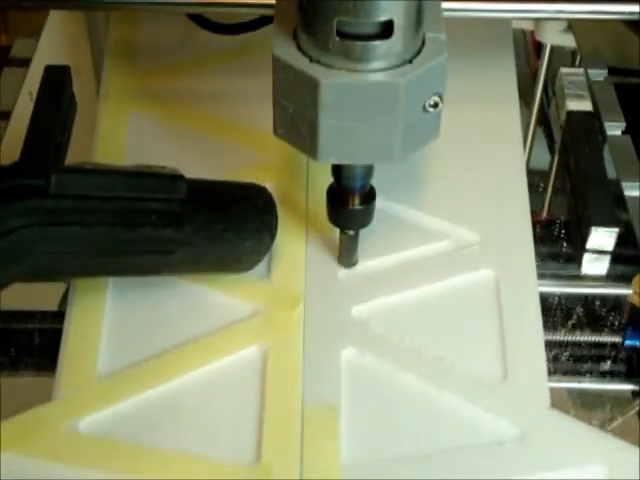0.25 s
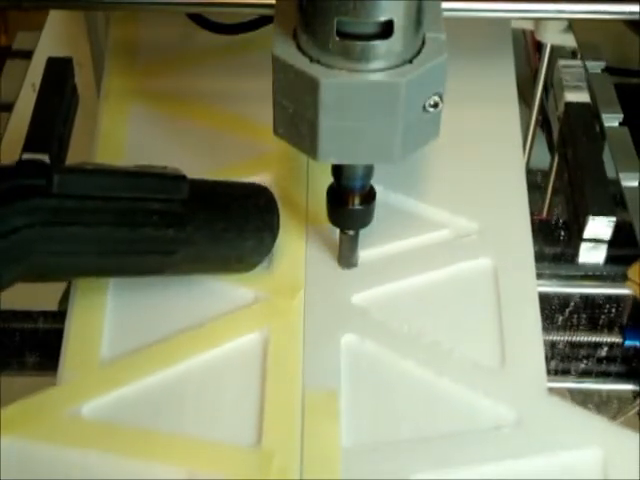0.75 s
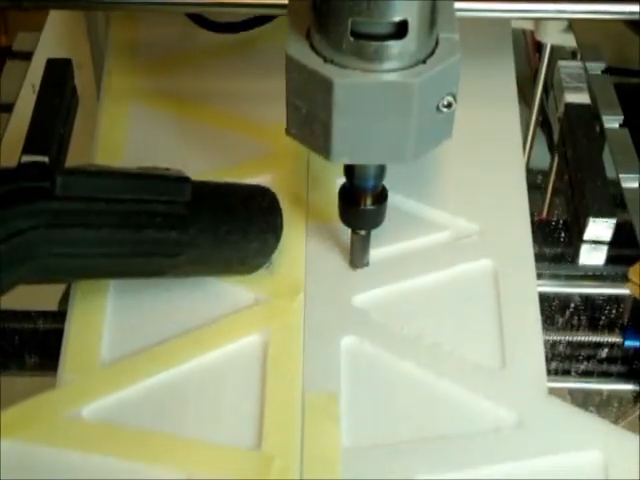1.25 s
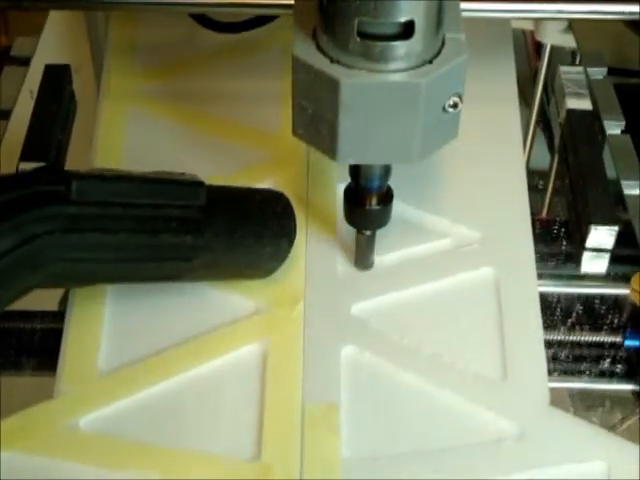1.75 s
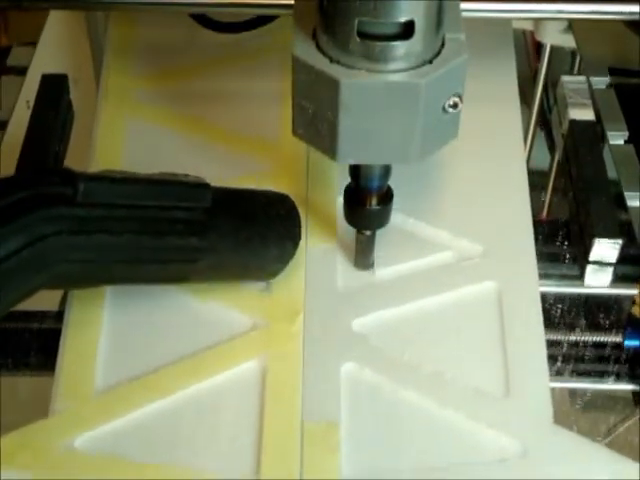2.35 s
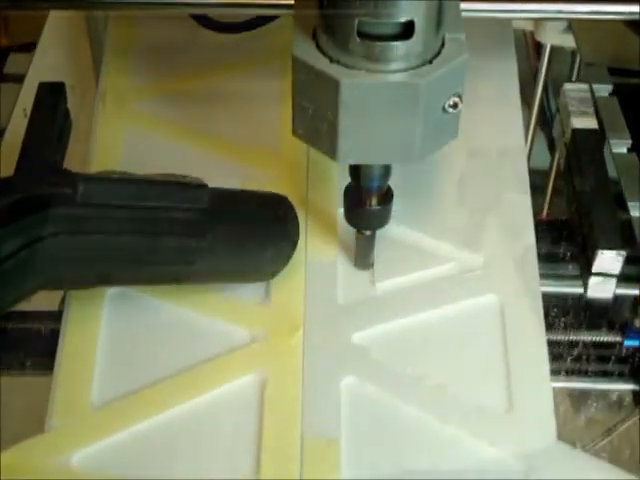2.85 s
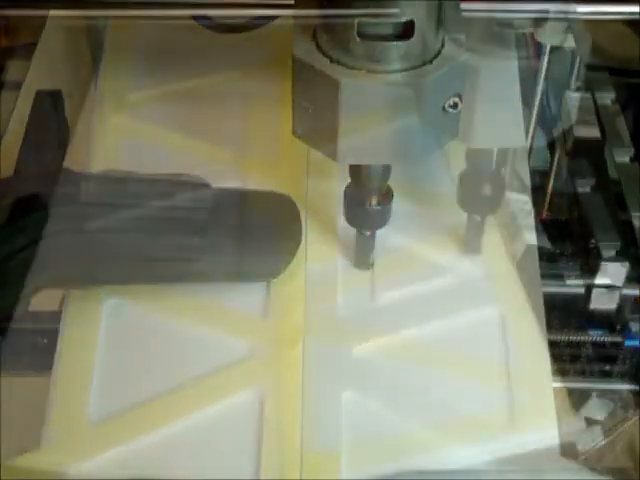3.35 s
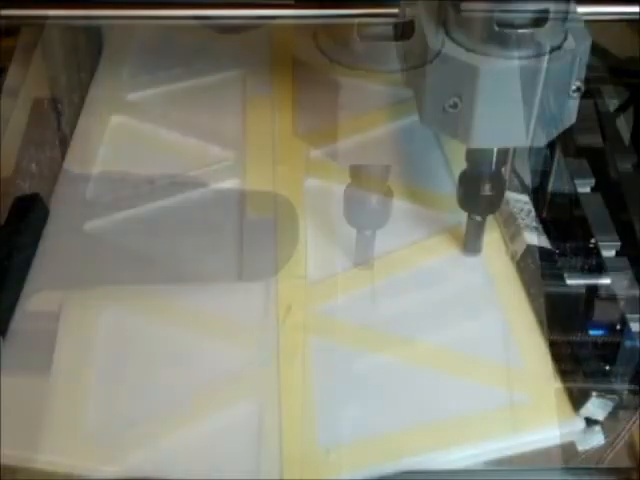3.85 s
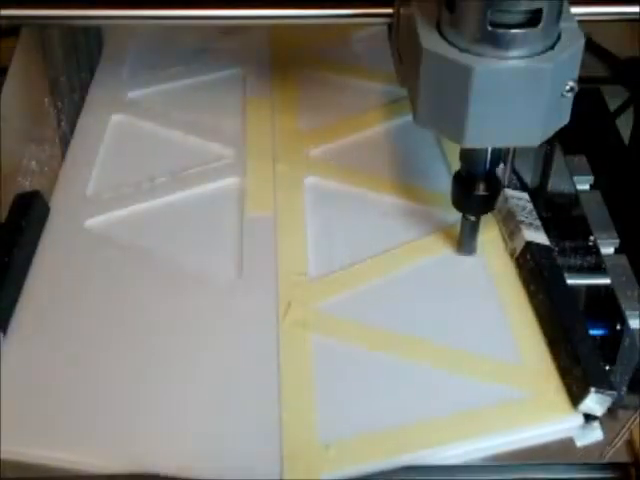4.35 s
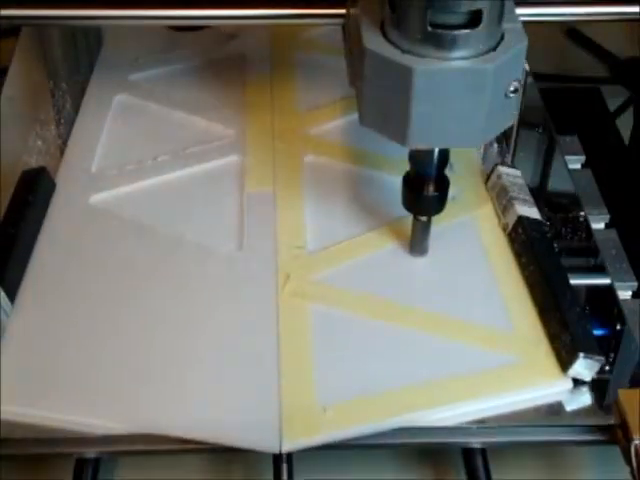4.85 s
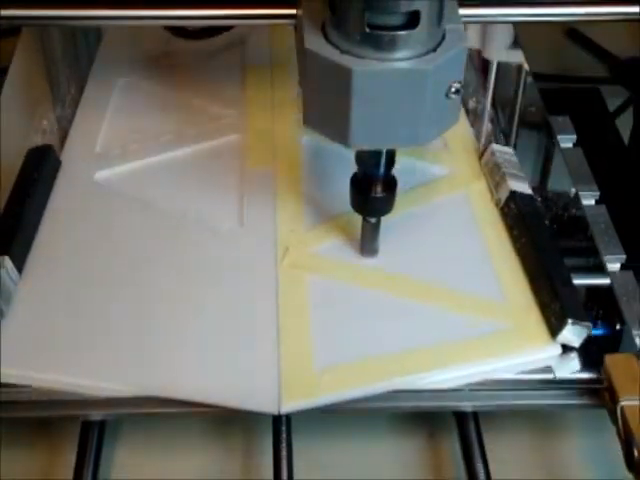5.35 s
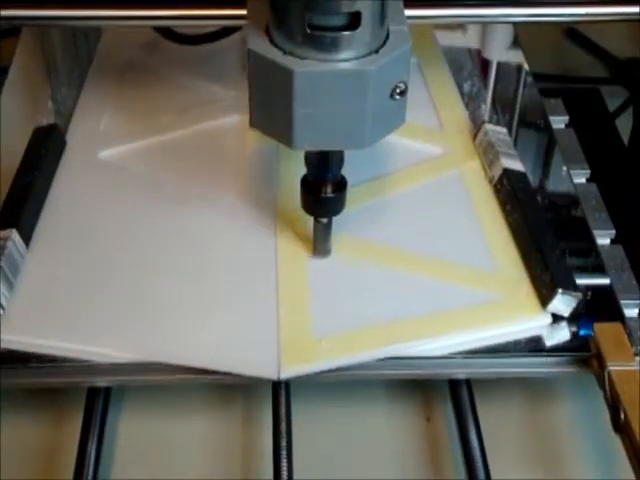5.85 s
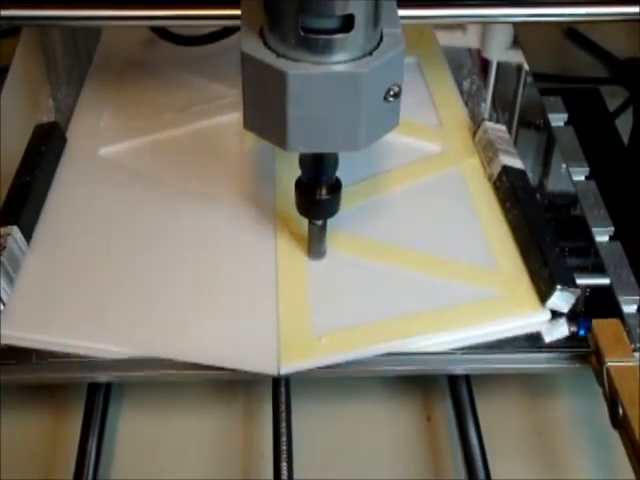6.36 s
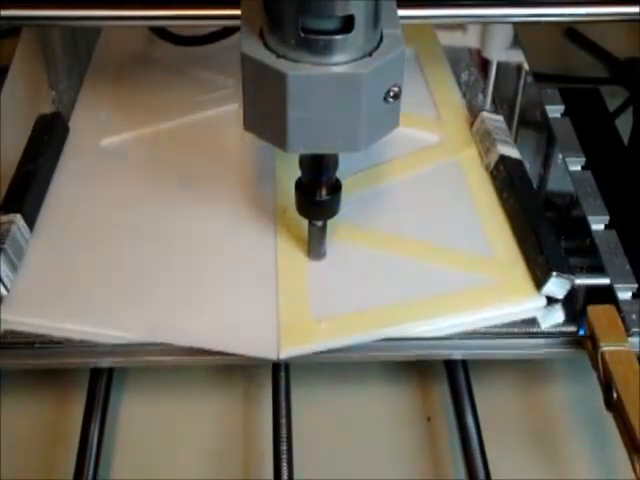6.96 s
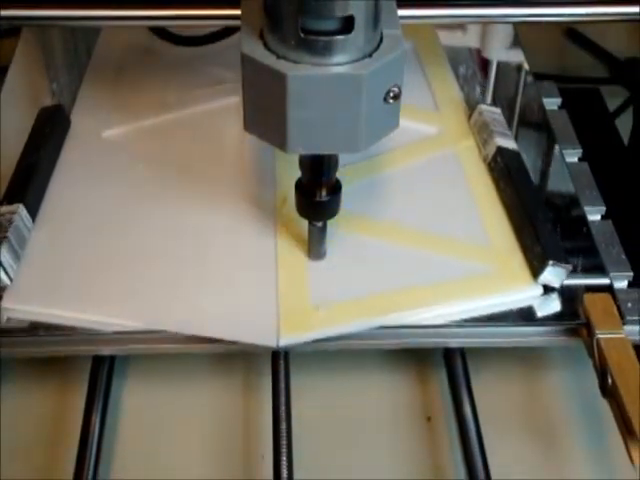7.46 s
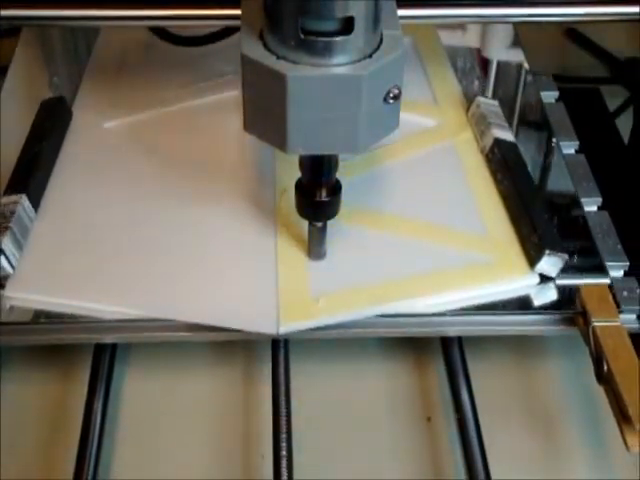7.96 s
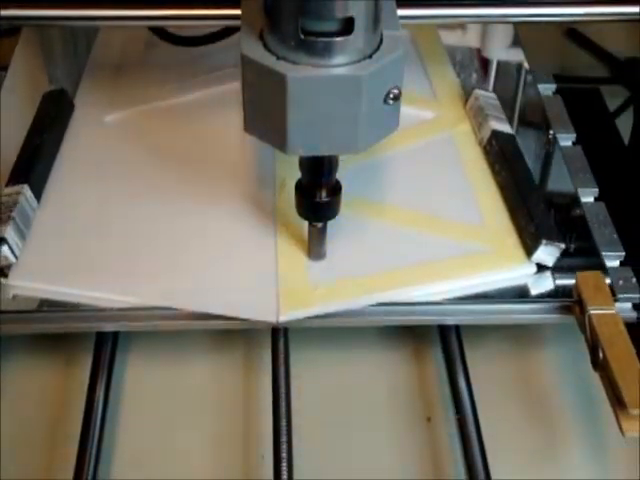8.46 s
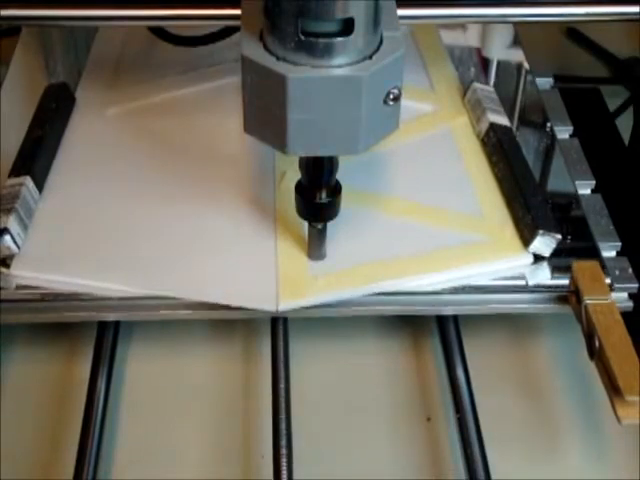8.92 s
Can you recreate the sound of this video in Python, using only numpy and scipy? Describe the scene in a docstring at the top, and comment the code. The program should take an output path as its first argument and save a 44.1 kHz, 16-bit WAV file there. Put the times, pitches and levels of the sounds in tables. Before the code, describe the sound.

A vacuum hose rushes throughout, the loudest sound: a hollow, ringing stream of air with a fluttering high hiss and a steady motor drone. Under it, a small router spindle hums, and its bearings add a thin, wavering whine and a faint shrill squeal. The rush swells slightly around 1 second, then dips near 1.5 seconds as the spindle slows a touch, cutting into foam. The sound is quietest at about 3.5 seconds, then builds smoothly until nearly 6 seconds, becoming clearly louder. Between about 4.4 and 6 seconds, the carriage motors sing a few soft, very short gliding notes. Around 6.3 seconds the spindle sags very slightly again. The rush holds steady, and a high fan tone grows stronger from about 8 seconds to the end, just past 9 seconds. Everything is heard close up, in mono, in a home workshop.

```python
"""Small CNC router milling foam

A vacuum hose sucks up the chips: its rush of air, the loudest sound, rings in the hose and the frame
while the vacuum motor drones. The spindle that turns the cutter hums, its bearings whine, and it slows
whenever the cutter bites into the foam. Stepper motors sing briefly as the carriage changes pace.
One cut blends into a second, louder one."""
import sys
import numpy as np
from scipy import signal
from scipy.fft import rfft, irfft
from scipy.io import wavfile
from scipy.ndimage import uniform_filter1d

SR = 44100
rng = np.random.default_rng(int(sys.argv[2]) if len(sys.argv) > 2 else 0)


def output_pcm(signal):
    """Save a mono or channel-first signal as 16-bit PCM at the path in sys.argv[1].

    Samples are clipped to [-1, 1] before scaling.
    """
    pcm = np.clip(np.atleast_2d(signal).T, -1, 1) * 32767
    wavfile.write(sys.argv[1], SR, np.round(pcm).astype(np.int16))


N = 405279
TIME = np.arange(N) / SR
CUT_BLEND_S = (2.9, 5.9)  # cut 1 turns into cut 2 between these times


# The level of the rushing air, sinking as cut 1 fades out and rising as cut 2 fades in: (time [s], level [dB])
RUSH_LEVELS = [(0, -44), (1.1, -40.5), (2.05, -44.5), (3.55, -49), (5.75, -38), (9.19, -38.2)]
# Brief drops in that level: (deepest at [s], fall [s], recovery [s], depth [dB])
RUSH_DIPS = [(0.25, 0.22, 0.6, 3.5), (1.27, 0.07, 0.099, 3.5), (1.465, 0.052, 0.63, 6.5),
             (1.6, 0.076, 0.11, 3.6), (6.35, 0.05, 0.3, 1.3), (7.01, 0.1, 0.15, 1.5)]

def rush_level():
    """The guide level in dB that the air and most of the tones follow."""
    return curve(RUSH_LEVELS) - bumps(RUSH_DIPS)


# How strong the air is from low to high pitch: (frequency [Hz], in cut 1 [relative dB], in cut 2 [relative dB])
AIR_SPECTRUM = [(30, -39, -43), (80, -38.5, -43), (139, -36, -33), (187, -21, -22), (349, -18.5, -19),
                (473, -1.5, -0.5), (605, 1.5, 1.5), (1207, -6, -9.5), (1850, -9.5, -10.5),
                (3840, -7.5, -11), (5260, -15, -13), (7010, -5, -8), (8530, -16, -18.0), (9840, -10.5, -12)]
# Pitches that hose, bed and frame boost or swallow:
# (frequency [Hz], width [Hz], boost in cut 1 [dB], boost in cut 2 [dB])
RESONANCES = [(403, 7, -7, 1.5), (451, 25, -9, -14), (483, 24.4, -11, -6.5), (547, 27, -9.5, -13.5),
              (554, 13, 1.5, -3), (602, 19, -6.5, -3), (686, 9.9, -3, -7), (711, 22, -2.5, -2.0),
              (784, 52, -8, -3), (899, 42, -10.5, -6.5), (929, 65, 7.0, 7.5), (970, 29, -9, -7.5),
              (1080, 22, -11, -10), (1073, 115, 9, 9), (1210, 22, 3.5, 2.5), (1246, 217, 4, 5),
              (1567, 22, 0, -3.5), (1634, 97, 4, 6.5), (1772, 19, 2, 8), (2320, 87, 1, 3),
              (2670, 370, 5, 7), (2900, 470, -3.5, -0.5), (3590, 360, -0.5, 6.5), (4540, 260, -4, 0.5),
              (4820, 140, 0.0, 4.0), (6070, 342, 1.5, 3.5), (6500, 422, -1, -3.5), (7040, 420, -11, -7.5),
              (7810, 102, 4.5, 6), (9320, 250, -3, -4)]

def air_rush(rush_db, boost_db=2.0, eddy_db=0.43, flutter_db=0.35, ripple_db=2.03):
    """Air swirls at the nozzle and makes noise, which rings in the hose, bed and frame."""
    size, hop = 4096, 512
    hz = np.fft.rfftfreq(size, 1 / SR)
    frame_times = np.arange(N // hop + 9) * hop / SR
    points, modes = np.array(AIR_SPECTRUM), np.array(RESONANCES)
    peaks = 1 / (1 + (2 * (hz - modes[:, :1]) / modes[:, 1:2]) ** 2)
    cuts_db = [np.interp(np.log(hz + 1), np.log(points[:, 0]), points[:, 1 + cut])
               + modes[:, 2 + cut] @ peaks for cut in range(2)]
    # echoes off bed and walls make some high pitches a little louder, others softer
    ripple = evened(uniform_filter1d(rng.standard_normal(len(hz)), size=2))
    ripple *= np.interp(hz, [600, 1400], [0, 1])
    colour = gain_of(by_cut(*cuts_db, frame_times[:, None]) + ripple_db * ripple)
    colour /= np.linalg.norm(colour, axis=1, keepdims=True)
    # small swirls come and go: random patches, smoothed over time and then pitch
    eddies = uniform_filter1d(rng.standard_normal(colour.shape), size=6, axis=0)
    eddies = evened(uniform_filter1d(eddies, size=40, axis=1))
    noise = signal.stft(rng.standard_normal(N + 2 * size), nperseg=size, noverlap=size - hop)[2].T
    shaped = noise[:len(frame_times)] * colour * gain_of(eddy_db * eddies)
    rush = signal.istft(shaped.T, nperseg=size, noverlap=size - hop)[1][:N]
    return evened(rush) * gain_of(rush_db + boost_db + flutter_db * wander(31))


# The lower hiss band swells: (loudest at [s], rise [s], fall [s], height [dB])
HISS_SWELLS = [(0.3, 0.28, 0.5, 7.5), (1.58, 0.27, 0.45, 4), (9.19, 3.4, 0.5, 6.5)]
# The upper hiss band thins out: (deepest at [s], fall [s], recovery [s], depth [dB])
HISS_LULLS = [(0.8, 0.4, 0.4, 4), (2.8, 0.71, 0.57, 6), (5.8, 0.28, 0.49, 9), (7.7, 0.7, 0.51, 8)]

def with_hiss(rush, squeal_lead_db, flutter_db=1.2):
    """Makes two high bands of the rush flutter; the upper one partly follows the bearing squeal."""
    lower_db = by_cut(-1.5, -2.5) + bumps(HISS_SWELLS)
    upper_db = 11 + 0.42 * squeal_lead_db - bumps(HISS_LULLS)
    out = rush
    for band_hz, boost_db in [((8050, 9100), lower_db), ((9500, 10800), upper_db)]:
        band = signal.sosfiltfilt(signal.butter(3, band_hz, "band", fs=SR, output="sos"), rush)
        out = out + band * (gain_of(boost_db + flutter_db * wander(45)) - 1)
    return out


# The cutter bites into the foam and slows the shaft:
# (start [s], end [s], bite time [s], release time [s], speed lost [turns/s])
BITES = [(-0.3, 0.22, 0.1, 0.35, 1.26), (1.351, 3.05, 0.48, 0.1, 0.75), (6.321, 9.3, 0.088, 0.1, 0.55)]

def shaft_sag(creep_hz_per_s=0.19):
    """Turns per second lost to the foam; the shaft keeps slowing while the cutter stays in."""
    return sum(gate(start, end, bite, release) * (lost_hz + creep_hz_per_s * (TIME - start))
               for start, end, bite, release, lost_hz in BITES)


def shaft_level(rush_db, sag, cuts_db, follow, damping_db):
    """A shaft tone's level in dB: it swells with the rush and is damped by the foam."""
    blend_s, usual_rush_db = (3.0, 4), -40
    swell_db = follow * (rush_db - usual_rush_db)
    return by_cut(*cuts_db, span=blend_s) + swell_db - by_cut(*damping_db, span=blend_s) * sag ** 2


TOP_SPEED_HZ = 233.6  # shaft turns per second with no load

def spindle(rush_db, sag, squeal_db):
    """One shaft drives all these tones, so they drop in pitch together when it slows."""
    turns = np.cumsum(TOP_SPEED_HZ - sag) / SR
    return (shaft_hum(turns, rush_db, sag) + fan(turns, rush_db)
            + bearings(turns, rush_db, squeal_db) + top_speed_whistle(turns, sag))


def shaft_hum(turns, rush_db, sag):
    """The unbalanced shaft shakes once a turn, and for a while also wobbles at half that rate."""
    hum_db = shaft_level(rush_db, sag, cuts_db=(-64.5, -60), follow=0.84, damping_db=(3.5, 5.5))
    hum = tone(turns, hum_db + 0.56 * wander(6))
    wobble = tone(turns / 2, db=-83.5) * gate(start=2.85, end=4.24, rise=1.39, fall=0.22)
    return hum + wobble


def fan(turns, rush_db, blades=10, swell_db=6.3):
    """Each passing blade of the spindle's fan pushes the air; the tone grows louder near the end."""
    swell = gate(start=8.18, end=TIME[-1], rise=0.2, fall=0.2)
    fan_db = rush_db + by_cut(-23, -20) + swell_db * swell
    return tone(blades * turns + 0.083 * wander(9), fan_db + 1.5 * wander(10))


# Bearing and brush tones, with levels compared to the rush:
# (pitch [times the shaft rate], level in cut 1 [dB], level in cut 2 [dB])
BEARING_TONES = [(2, -25, -36), (14.68, -26, -19), (15.67, -32, -23), (20.0, -27, -33), (22.01, -27, -33),
                 (26.04, -25, -23), (26.32, -29, -21), (26.46, -33, -24), (27.33, -24, -36),
                 (28.32, -28, -26), (28.71, -18, -23), (29.34, -24, -25), (29.5, -24, -31),
                 (29.73, -26, -27), (30.03, -34, -27), (30.33, -28, -31), (31.2, -26, -32),
                 (31.99, -27, -31), (32.61, -19, -30), (34.01, -23, -28), (34.61, -27, -29),
                 (35.83, -30, -36), (35.97, -28, -38), (38.09, -28, -29), (39.02, -28, -31),
                 (40.01, -29, -42), (40.88, -25, -35), (41.6, -25, -28), (42.54, -29, -26),
                 (42.86, -41, -26), (43.0, -28, -26)]

def bearings(turns, rush_db, squeal_db, squeal_multiple=42.393):
    """A shrill squeal over a whine; the balls slip a little, so each tone wavers."""
    out = tone(squeal_multiple * turns + 0.15 * wander(4.7), squeal_db + 2.6 * wander(27))
    for multiple, first_db, second_db in BEARING_TONES:
        level_db = rush_db + by_cut(first_db, second_db)
        out += tone(multiple * turns + 0.1 * wander(6.5), level_db + wander(5.9))
    return out


# Faint tones of the spindle at top speed: (frequency [Hz], level before the trim [dB])
WHISTLE_TONES = [(2573, -61), (3505, -71), (6153, -61.5), (6385, -73), (6616, -66), (6853, -69),
                 (6944, -76), (7294, -78), (7617, -74), (7903, -69), (7994, -68), (8086, -69), (8904, -69),
                 (9227, -77), (9717, -71), (9760, -67.5)]

def top_speed_whistle(turns, sag, trim_db=-9.5, silent_at_sag_hz=0.6):
    """Thin, high tones that fade away as soon as the shaft slows."""
    at_top = np.clip(1 - sag / silent_at_sag_hz, 0, 1)
    return at_top * sum(tone(hz / TOP_SPEED_HZ * turns + 0.045 * wander(3.2), db + trim_db)
                        for hz, db in WHISTLE_TONES)


# The vacuum motor's higher tones, with levels compared to the rush:
# (pitch [times the drone's pitch], level in cut 1 [dB], level in cut 2 [dB])
VACUUM_TONES = [(1.16, -29, -35), (2, -20.5, -21), (2.75, -21.5, -26), (6, -21.5, -27)]
# Hum from the power supply: (frequency [Hz], level compared to the rush [dB])
MAINS_HUM = [(100, -54), (200, -44.5)]

def vacuum_motor(rush_db, drone_hz=403.8):
    """The suction motor spins steadily: a drone, a few higher tones and a trace of electric hum."""
    turns = drone_hz * TIME + 0.045 * wander(3)
    drone_db = rush_db + by_cut(-15, -24.5, span=(3.46, 3.75))
    out = tone(turns, drone_db + 1.3 * wander(4.7))
    for multiple, first_db, second_db in VACUUM_TONES:
        out += tone(multiple * turns, rush_db + by_cut(first_db, second_db) + 2.1 * wander(3.2))
    return out + sum(tone(hz * TIME, rush_db + db) for hz, db in MAINS_HUM)


# Sliding notes of the motors that move the carriage:
# (start [s], length [s], start pitch [Hz], end pitch [Hz], peak level [dB])
STEPPER_GLIDES = [(1.3, 0.15, 1235, 1280, -60), (4.435, .09, 1490, 1580, -51.5),
                  (5.285, 0.14, 1320, 1280, -51.5), (5.686, 0.16, 682, 664, -47.5),
                  (5.873, 0.083, 1574, 1450, -47.5), (5.897, .07, 1130, 1120, -44.5)]

def steppers():
    """Stepper motors sing short, soft glides as they speed up or slow down."""
    out = np.zeros(N)
    for start, length, start_hz, end_hz, db in STEPPER_GLIDES:
        progress = np.clip((TIME - start) / length, 0, 1)
        turns = np.cumsum(start_hz + (end_hz - start_hz) * progress) / SR
        out += tone(turns + 0.08 * wander(50), db) * np.sin(np.pi * progress)
    return out


def tone(turns, db):
    """A pure tone with one wave per turn, at the given average (rms) level."""
    angle = 2 * np.pi * (turns - np.floor(turns) + rng.random())
    return np.sin(angle.astype(np.float32)) * gain_of(db) * np.sqrt(2)


def wander(rate_hz, size=2048):
    """A smooth random drift, about 1 in size, with little motion faster than the rate."""
    hz = np.fft.rfftfreq(size, N / SR / size)
    slow = irfft(rfft(rng.standard_normal(size)) / (1 + (hz / rate_hz) ** 4))
    return np.interp(np.arange(N), np.linspace(0, N, size), evened(slow))


def by_cut(first, second, t=TIME, span=CUT_BLEND_S):
    """Slides from a value in cut 1 to its value in cut 2 over the span, in seconds."""
    return first + (second - first) * np.interp(t, span, [0, 1])


def gate(start, end, rise, fall):
    """Rises from 0 at the start, holds at 1, and falls after the end; all times in seconds."""
    rising = (TIME - start) / max(rise, .001)
    falling = 1 - (TIME - end) / max(fall, .001)
    return np.clip(np.minimum(rising, falling), 0, 1)


def bumps(rows):
    """Adds up one straight rise and fall for each row."""
    return sum(height * gate(peak - rise, peak, rise, fall) for peak, rise, fall, height in rows)


def curve(rows):
    """Joins points (time [s], value) with straight lines."""
    return np.interp(TIME, *np.transpose(rows))


def gain_of(db):
    """Turns decibels into a number to multiply by."""
    return np.exp(np.asarray(db, np.float32) * np.float32(np.log(10) / 20))


def evened(x):
    """Scales a signal to an average (rms) size of 1."""
    return x / np.sqrt(np.mean(x ** 2) + 1e-20)


def scene():
    """Air, spindle and motors all reach one close microphone, so both channels are the same."""
    rush_db, sag = rush_level(), shaft_sag()
    squeal_db = shaft_level(rush_db, sag, cuts_db=(-65, -57), follow=0.25, damping_db=(1.5, 5))
    air = with_hiss(air_rush(rush_db), squeal_db - rush_db)
    mix = air + spindle(rush_db, sag, squeal_db) + vacuum_motor(rush_db) + steppers()
    return np.tile(mix, (2, 1))


def record(dry):
    """A steep filter removes the very highest treble."""
    cutoff_hz = 10070
    lowpass = signal.firwin(1023, cutoff_hz, window=("kaiser", 9), fs=SR)
    return signal.oaconvolve(dry, lowpass[None], "same")


dry = scene()
out = record(dry)
output_pcm(out)
```